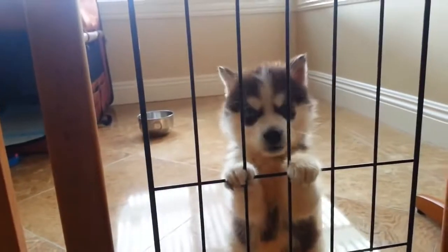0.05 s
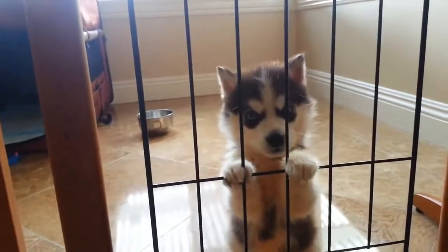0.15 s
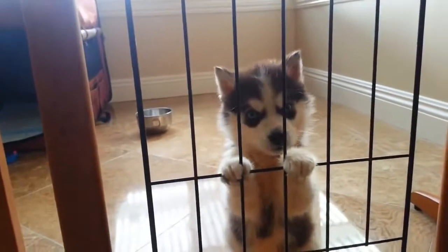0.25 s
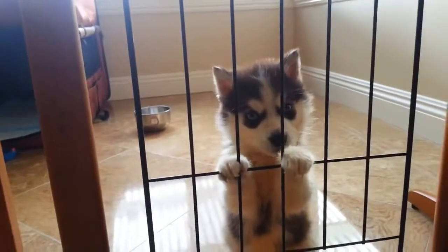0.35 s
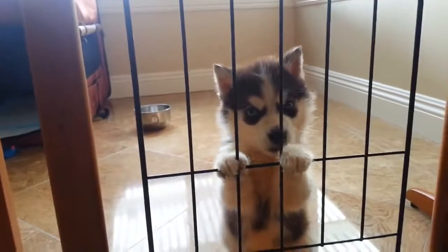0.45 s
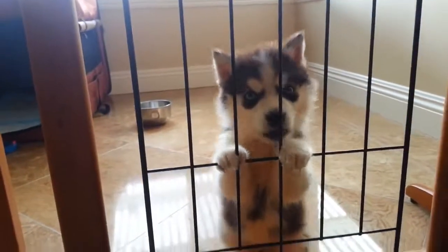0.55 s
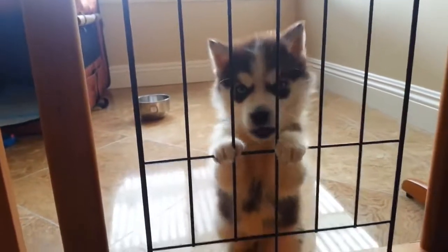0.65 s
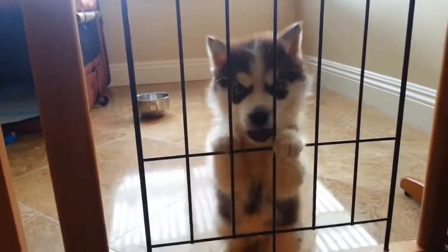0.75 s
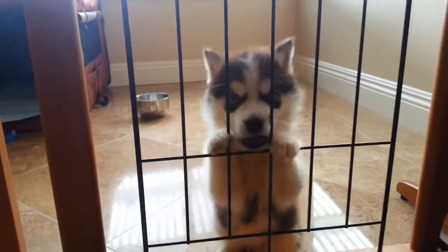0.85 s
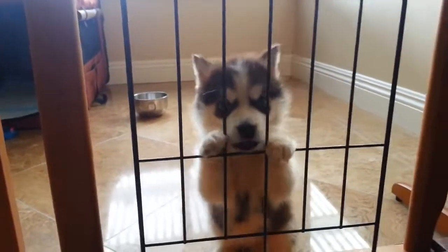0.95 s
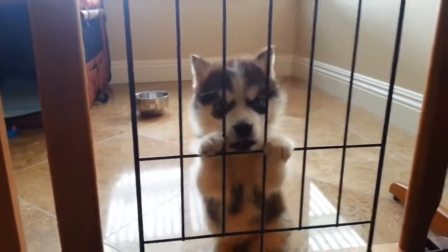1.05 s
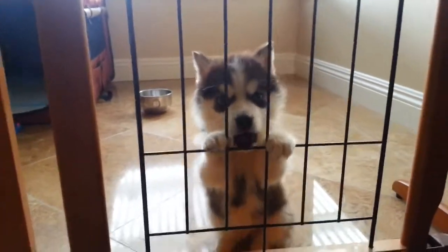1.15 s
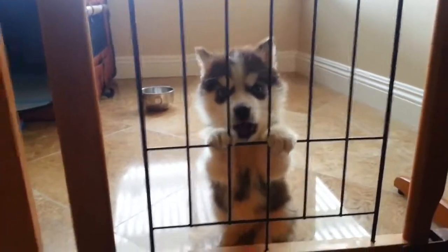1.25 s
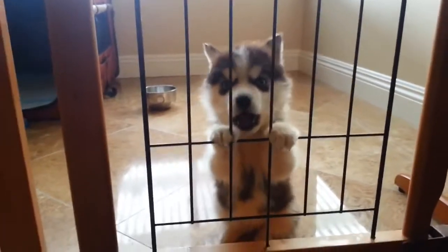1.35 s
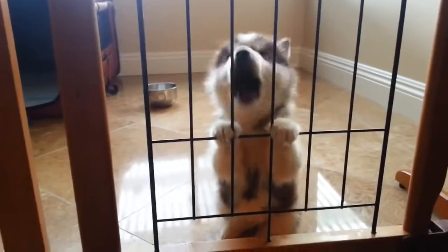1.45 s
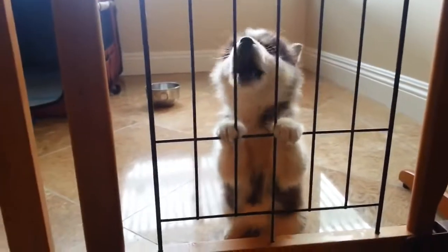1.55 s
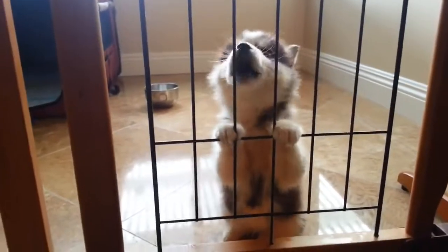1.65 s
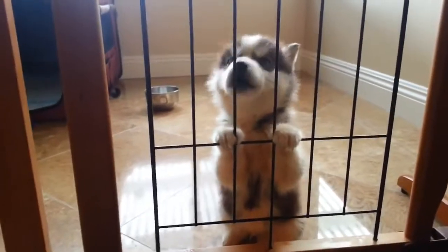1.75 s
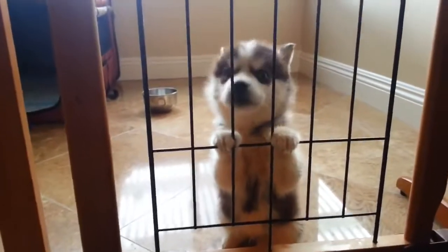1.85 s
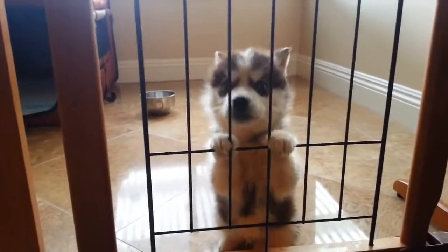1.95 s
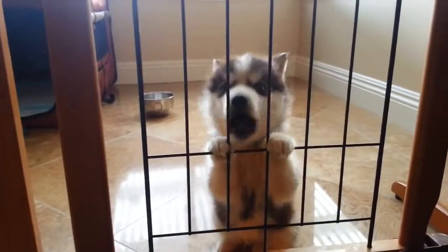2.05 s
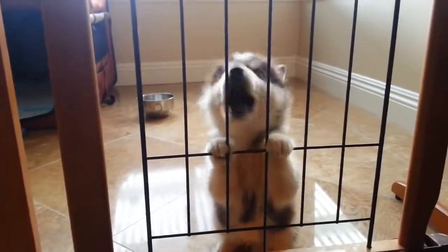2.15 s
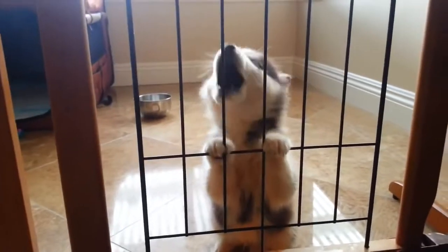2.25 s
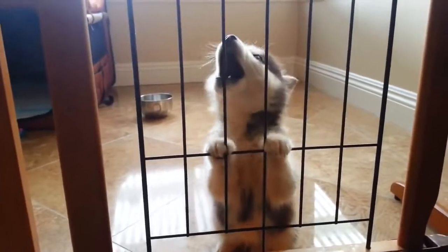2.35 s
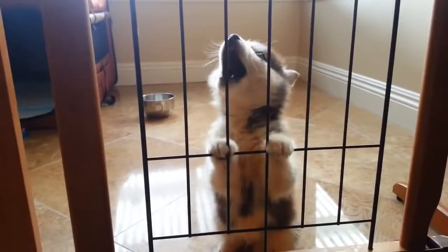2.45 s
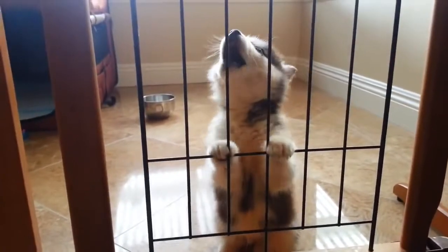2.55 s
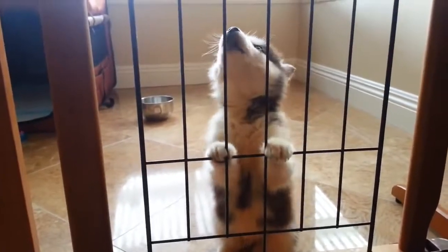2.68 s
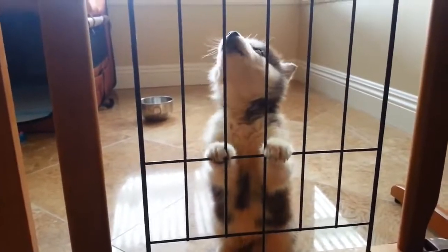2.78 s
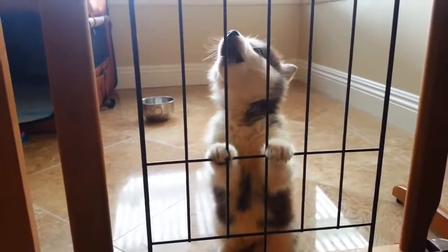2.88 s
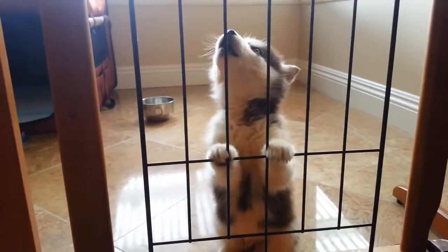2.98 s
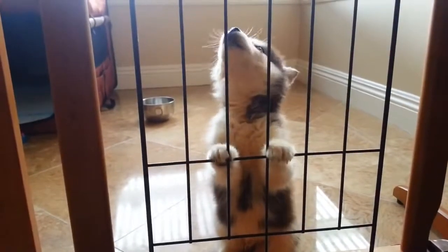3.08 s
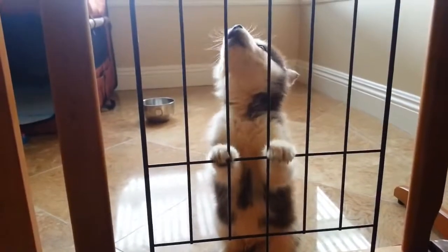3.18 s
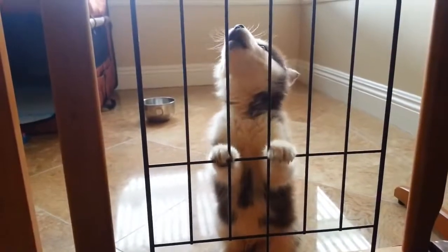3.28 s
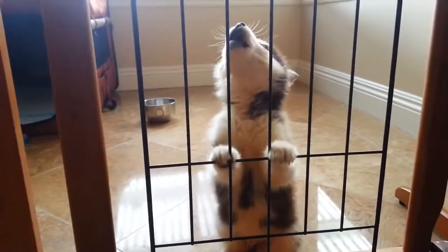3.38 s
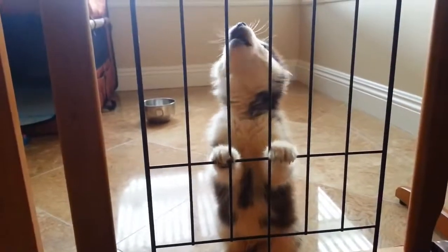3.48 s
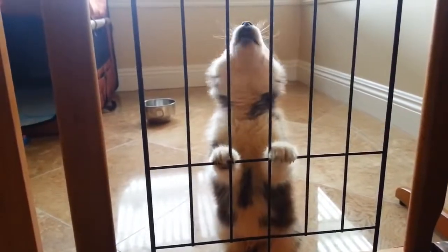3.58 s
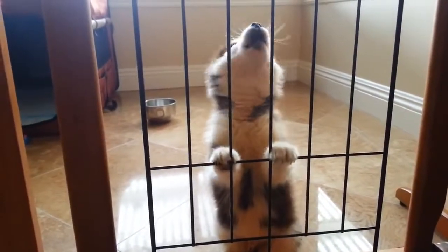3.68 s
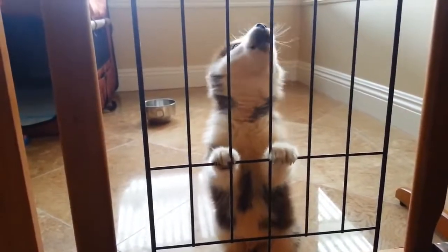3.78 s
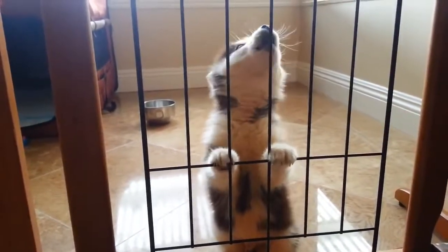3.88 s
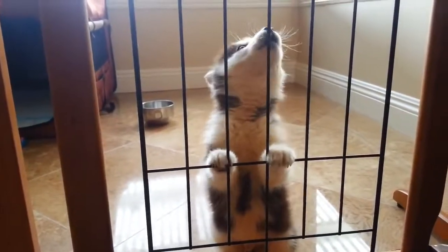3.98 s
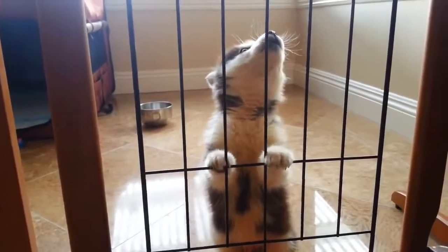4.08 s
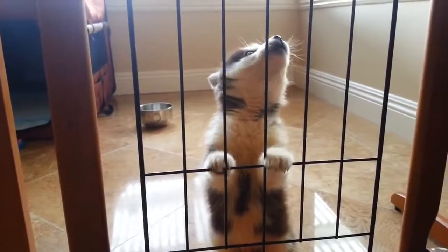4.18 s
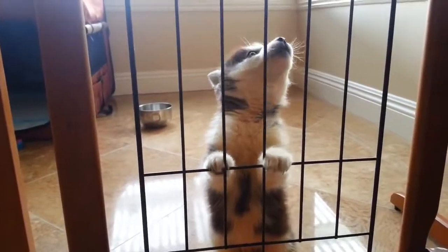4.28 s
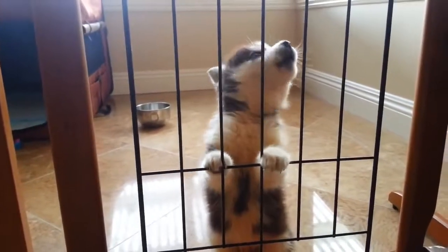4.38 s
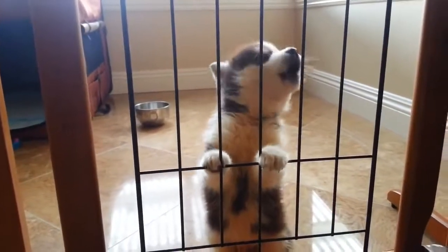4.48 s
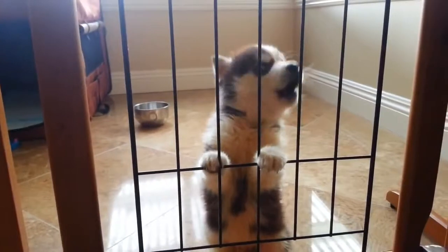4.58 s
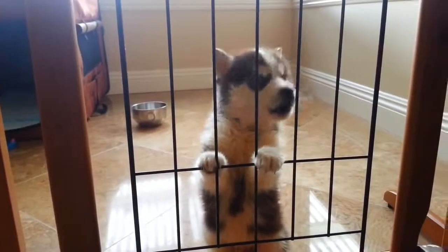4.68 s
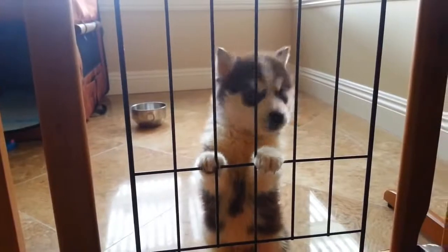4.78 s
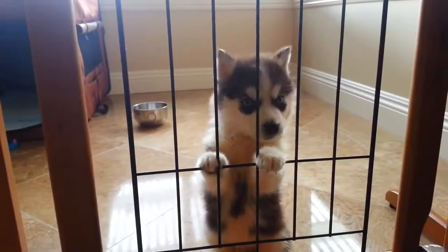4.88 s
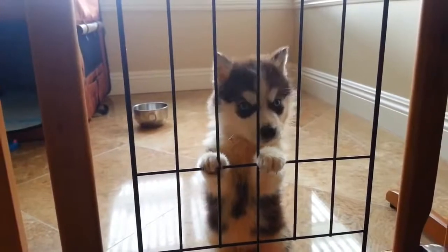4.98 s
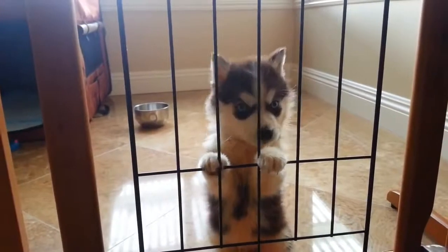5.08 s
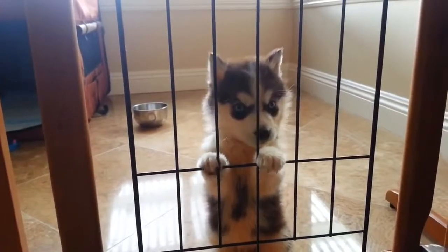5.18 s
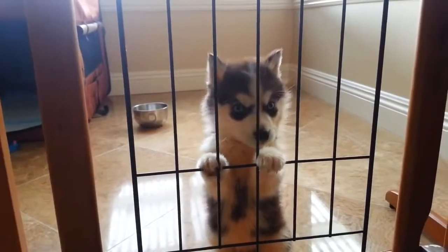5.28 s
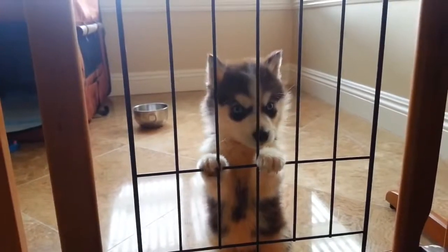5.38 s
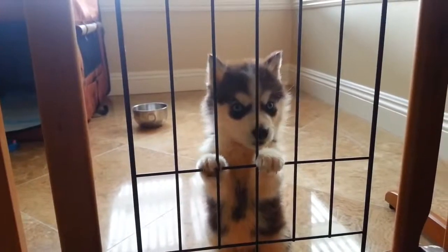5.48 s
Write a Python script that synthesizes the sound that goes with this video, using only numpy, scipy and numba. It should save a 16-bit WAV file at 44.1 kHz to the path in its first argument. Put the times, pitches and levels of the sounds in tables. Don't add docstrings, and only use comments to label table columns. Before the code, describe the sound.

Indoors in a hard tiled room, a fading puppy whine rings out and claws tick on pen wire. A faint sniff leads into a chirp and a warbling yowl, then separate swooping yelps that crack and fall. A short whimper and clipped gulp precede one long steady howl. It closes with a tiny breath, leaving very quiet room tone. A close phone microphone picks up bright echoes and low hum.

```python
import sys
import numpy as np
from scipy import signal
from scipy.fft import rfft, irfft
from scipy.io import wavfile
from scipy.ndimage import uniform_filter1d, minimum_filter1d
from numba import njit

SR = 44100
rng = np.random.default_rng(int(sys.argv[2]) if len(sys.argv) > 2 else 0)


def pcm_store(signal):
    levels = np.round(np.clip(np.atleast_2d(signal), -1, 1) * 32767)
    wavfile.write(sys.argv[1], SR, levels.astype(np.int16).T)


def field_ratio(decibels):
    return 10 ** (np.asarray(decibels, dtype=float) / 20)


N = 243873
TIME = np.arange(N) / SR
HZ = np.arange(N // 2 + 1) * SR / N


def on_log(table, hz):
    f, v = np.transpose(table)
    return np.interp(np.log(np.maximum(hz, 1)), np.log(f), v)


def unit(x):
    return x / np.sqrt(np.mean(x ** 2))


def band(x, hz, width_hz):
    return irfft(rfft(x) / (1 + ((HZ - hz) / width_hz) ** 2), N)


def walk(rate_hz):
    k = int(SR / rate_hz)
    steps = np.repeat(rng.standard_normal(N // k + 1), k)
    return unit(uniform_filter1d(uniform_filter1d(steps, k), k)[:N])


def loudness(x, seconds):
    keep = np.exp(-1 / (seconds * SR))
    return np.sqrt(signal.lfilter([1 - keep], [1, -keep], np.mean(x ** 2, axis=0), zi=[1e-3])[0])


# [f/Hz, level/dB]
YELP = [(820, -22), (1400, -14.5), (1900, -15), (2300, -20.5), (2870, -3), (3350, -18), (3880, -5),
        (4200, -12.5), (4450, -7.5), (5150, -17.5), (5700, -0.5), (6150, -12.5), (6650, -19.5),
        (7600, -15.5), (8950, -24.5), (13000, -49.5)]
YELP_UP = [(940, -27.5), (1600, -11.5), (2200, -23), (2600, -5), (3330, -20.5), (3900, -37), (4700, -28.5),
           (5400, -11), (6250, 2), (6900, -43), (9970, -48), (11200, -86), (22000, -120)]
YELP_RAISED = [(940, -18.5), (1600, -14.5), (2100, -8.5), (2600, -15), (3400, -6), (3900, -35.5),
               (4700, -26.5), (5300, -12.5), (6100, -20.5), (6700, -10), (7700, -16.5), (9970, -26.5),
               (11200, -90), (22000, -120)]
YELP_SHUT = [(820, -15.5), (1400, 6), (1820, -3), (2140, -37), (2560, -4.5), (3140, -41.5), (3800, -56),
             (5740, -18), (7520, -25.5), (9670, -45.5), (12000, -80.5), (15600, -114), (22000, -120)]
WHINE = [(1060, -28), (1850, 5), (2500, -27), (3500, -18), (5200, -9.5), (6500, -6), (7400, 1),
         (8500, -15.5), (11000, -45)]
YOWL = [(1180, -37), (2000, 12.5), (2620, -5.5), (3370, -5), (4400, 1.5), (5810, 3), (6570, 3.5),
        (9780, -15.5), (11800, -21.5), (14000, -65)]
YOWL_WIDE = [(1180, -25), (2000, -2), (2750, -14.5), (3300, -0.5), (3800, -2), (5300, -5), (6300, -15),
             (7600, -6.5), (8600, -21.5), (10200, -18), (11000, -44.5), (12500, -74)]
YOWL_FRONT = [(1180, -24.5), (2500, -47), (3150, -17.5), (4200, -9), (4980, 0.5), (5530, 4.5), (5950, -16),
              (7000, -3.5), (8200, -15.5), (9200, -23.5), (11100, -47), (12500, -71)]
YOWL_HARSH = [(1180, -28.5), (2100, 4.5), (2600, -16.5), (3100, 1.5), (3600, -4.5), (4300, -18.5),
              (5600, -3.5), (6400, -4), (7500, -12.5), (9780, -14), (12000, -52.5)]
YOWL_LOW = [(1180, -21), (2000, -2.5), (2620, 11), (3300, -4), (4000, -4), (4600, -6), (5250, 6),
            (5900, -5), (6500, 4), (7200, -3), (9780, -20), (11800, -40), (14000, -68.5)]
YOWL_PEAL = [(1180, -34), (2400, 3), (2980, -4), (3600, -15), (4600, -10.5), (5500, 2), (6500, -8),
             (7300, -8), (9920, -21), (11500, -72.5)]
HOWL = [(1060, -40.5), (1800, -7), (2600, -7.5), (2930, -25.5), (4270, -28), (5740, -5), (6100, -12.5),
        (7390, -16), (7990, -25.5), (9100, -17), (11500, -44.5), (14400, -26)]
HOWL_LEVEL = [(1060, -39), (1900, -10), (2400, -25), (2930, -21), (3400, -27), (4270, -23.5), (5300, -5),
              (5740, 0.5), (6300, -3), (7390, -16), (7990, -27.5), (9100, -45.5), (11500, -37.5),
              (14400, -32.5)]
HOWL_OPEN = [(1060, -29), (1900, -5), (2420, -3), (2930, -17), (4270, -22), (5740, 1), (6100, 6),
             (7390, -23), (7990, -34), (9100, -31), (11500, -34), (14400, -32)]
HOWL_CLOSING = [(1060, -26), (1800, -2), (2510, -52), (2930, -14), (3230, -13), (3430, -22), (4010, -28.5),
                (4860, -2), (5490, -16.5), (7070, 6), (8490, -25), (14400, -32)]
# [t/s, pitch f/Hz, level/dB, overtone number the throat rings on, bright edge level/dB]
FADING = [(0.0, 656, -20, 1.8, -29), (.024, 605.6, -36.5, 1.7, -33.5), (.078, 580, -41, 1.5, -44),
          (.1, 569.5, -33.5, 1.4, -48.5), (.15, 580, -35.5, 1.3, -55), (.2, 606, -45.5, 1.2, -60)]
CHIRP = [(.755, 1035, -38, 1.8, -52), (.769, 1043, -17, 3.8, -25), (.8, 1096, -28.5, 2, -40.5),
         (.822, 1142, -47.5, 1, -34)]
SLIDE = [(.875, 1017, -50, 2, -42), (.887, 1018, -18, 2.58, -25), (.9, 968, -25, 2.47, -24.5),
         (.906, 663.7, -24, 2.4, -18.5), (.92, 652.4, -23, 2.23, -15)]
ARCH = [(.94, 880, -20, 2.38, -23.5), (.955, 972, -26.5, 2.6, -14.5), (.993, 887, -20.5, 1.85, -26),
        (1.03, 792, -28.5, 1.58, -19.5), (1.045, 682, -22.5, 2.6, -27.5), (1.055, 632, -17.5, 2.2, -21.5)]
WARBLE = [(1.08, 779, -29, 2.64, -22.5), (1.095, 798, -27.5, 2.4, -18), (1.131, 755, -19, 2.9, -26),
          (1.155, 705.4, -27, 2.5, -24.5), (1.175, 730, -27.5, 2.8, -24), (1.207, 686, -15, 2.06, -18.5),
          (1.25, 675.7, -22.5, 2.67, -23), (1.283, 825, -19, 2.03, -25), (1.3, 1071, -34, 1.74, -54)]
FALL = [(1.573, 1079, -31.5, 1.39, -30.5), (1.585, 1066, -18.5, 1.67, -9.5), (1.6, 986, -20.5, 1.82, -19),
        (1.655, 836, -16, 2, -31), (1.7, 739, -17.5, 2.37, -23)]
HOOK = [(1.716, 665.6, -20.5, 2.52, -26), (1.745, 706.4, -18.5, 2.57, -26.5),
        (1.765, 810, -20.5, 1.83, -17), (1.787, 738, -15.5, 1.84, -26.5)]
DROOP = [(1.82, 798, -23, 1.7, -59.5), (1.84, 695, -26.5, 1.64, -33.5), (1.95, 544, -31.5, 1.53, -45),
         (2.06, 529, -57.5, 0.92, -73.5)]
SECOND_FALL = [(2.224, 1107, -36.5, 1.69, -17.5), (2.245, 989.3, -19.5, 1.74, -21.5),
               (2.271, 944, -16, 1.96, -23.5), (2.332, 781, -18, 2.18, -25)]
REBOUND = [(2.337, 653.3, -24.5, 2.49, -16.5), (2.37, 635.3, -21, 2.65, -16), (2.4, 714.4, -22, 2.48, -17),
           (2.412, 996, -16.5, 2.31, -23), (2.432, 1073, -26.5, 1.43, -31.5)]
CRACK = [(2.436, 535, -20, 3.5, -22.5), (2.444, 525, -15, 2.75, -23.5), (2.454, 513, -28, 3, -26),
         (2.464, 557, -28.5, 2.74, -16), (2.476, 518, -30, 2.65, -21), (2.498, 539.5, -35.5, 3.1, -32),
         (2.514, 530, -35.5, 1.91, -27.5), (2.524, 517, -32, 2, -16)]
PEAL = [(2.528, 787, -18.5, 2.26, -22), (2.572, 811, -14.5, 2.05, -24), (2.585, 913.6, -9, 2.35, -11.5),
        (2.623, 924.6, -16, 1.89, -40), (2.66, 879.6, -15.5, 1.785, -26.5), (2.676, 779, -26, 1.7, -31.5),
        (2.687, 680, -28, 1.59, -41), (2.697, 632, -32.5, 1.57, -40.5), (2.72, 570, -25.5, 1.65, -35)]
WHIMPER = [(3.0, 713.3, -13.5, 2.32, -30), (3.03, 575.3, -38.5, 1.5, -36.5), (3.08, 540.2, -46, 1.5, -45),
           (3.126, 493.3, -43.5, 1.58, -62.5), (3.176, 475.8, -36.5, 1.9, -50.5),
           (3.214, 373.6, -44, 2.3, -44.5), (3.244, 290.2, -36.5, 2.52, -51),
           (3.26, 273.1, -42.5, 2.25, -51)]
GULP = [(3.459, 595, -13.5, 2.5, -34), (3.48, 598.5, -30, 1.9, -47.5)]
HOWL_RISE = [(3.61, 496, -43, 1.37, -44.5), (3.621, 512, -39.5, 1.87, -50.5),
             (3.629, 519.8, -27, 2.38, -47), (3.76, 529.2, -23.5, 2.376, -42),
             (3.88, 518.2, -13.5, 2.235, -41), (3.955, 515, -13.5, 2.21, -45), (3.984, 510, -26, 2.45, -43),
             (4.067, 487.2, -19, 2.33, -49), (4.13, 478.8, -19.5, 2.365, -47)]
HOWL_HOLD = [(4.22, 479.5, -25.5, 2.55, -42), (4.35, 485.8, -27.5, 2.45, -41), (4.41, 479, -25, 2.78, -40)]
HOWL_FLARE = [(4.45, 485.2, -19, 2.38, -41), (4.48, 479.2, -19, 2.58, -38.5)]
HOWL_EBB = [(4.53, 482.2, -25.5, 2.9, -40), (4.59, 483.7, -24, 3.5, -41.5), (4.686, 494.3, -32, 3.8, -39),
            (4.8, 495.5, -32.5, 2.7, -36.5), (4.85, 511.4, -43.5, 2.15, -37.5),
            (4.882, 506.5, -30.5, 1.45, -47)]
HOWL_END = [(4.906, 548, -38.5, 1.8, -40), (4.936, 531.5, -33, 1.57, -48), (4.941, 534, -29, 1.22, -55),
            (4.945, 720, -52, 1.83, -50), (4.955, 716, -30, 0.96, -46), (4.975, 673, -54, 1.13, -44)]
THROAT_Q = [2, 0.86, 2.7, 14, 3.3, 9.4, 4.5, 16, 31, 12, 12, 36, 3.3, 5.2, 4.3, 1.8, 4.45, 1.85, 1.76]


def voicing():
    voiced = [
        (FADING, WHINE, WHINE, .06, .9),
        (CHIRP, YOWL_WIDE, YOWL_WIDE, .04, .08),
        (SLIDE, YOWL_WIDE, YOWL_WIDE, .05, .05),
        (ARCH, YOWL_WIDE, YOWL_WIDE, .015, .03),
        (WARBLE, YOWL_WIDE, YOWL_FRONT, .015, .02),
        (FALL, YELP, YOWL, .14, .05),
        (HOOK, YOWL_HARSH, YOWL_HARSH, .04, .2),
        (DROOP, YOWL, YOWL, .5, .75),
        (SECOND_FALL, YOWL, YOWL, .07, .03),
        (REBOUND, YOWL_LOW, YOWL_LOW, .015, .05),
        (CRACK, YOWL, YOWL, .4, .55),
        (PEAL, YOWL_PEAL, YOWL_PEAL, .015, .12),
        (WHIMPER, YELP_RAISED, YELP_RAISED, .7, .8),
        (GULP, YELP_SHUT, YELP_SHUT, .5, .6),
        (HOWL_RISE, HOWL, HOWL, .03, .01),
        (HOWL_HOLD, HOWL_LEVEL, HOWL_LEVEL, .008, .008),
        (HOWL_FLARE, HOWL_OPEN, HOWL_OPEN, .008, .008),
        (HOWL_EBB, HOWL_LEVEL, HOWL_CLOSING, .008, .02),
        (HOWL_END, HOWL_CLOSING, HOWL_CLOSING, .25, .8),
    ]
    return [(*v, q) for v, q in zip(voiced, THROAT_Q)]


# [share of length 0-1, level/dB, edge level/dB]
SCOOP_SWELL = [(0, -21, -13), (.15, -5.5, -7), (.6, -1.5, -3), (1, -8, -3.5)]


def scoop(start_s, length_s, from_hz, to_hz, db, throat_hz, edge_db, swell_db):
    bend, catch_overtone = 2.1, 1.7
    u = np.linspace(0, 1, 12)
    hz = from_hz * (to_hz / from_hz) ** u ** bend
    share, level_db, edge_level_db = np.transpose(SCOOP_SWELL)
    tilt_db = swell_db * (u - .5)
    level = db + tilt_db + np.interp(u, share, level_db)
    edge = edge_db + tilt_db + np.interp(u, share, edge_level_db)
    return np.transpose([start_s + length_s * u, hz, level, np.maximum(throat_hz / hz, catch_overtone), edge])


# [t/s, length/s, from f/Hz, to f/Hz, level/dB]
SCOOPS = [(1.485, 0.083, 375, 941.7, -19), (2.134, 0.078, 345, 864.7, -16.5),
          (2.885, .093, 405, 888, -16.5), (3.385, 0.064, 350, 576, -20)]
# [resonance f/Hz, bright edge level/dB, Q, extra swell/dB]
SCOOP_THROAT = [(1359, -15.5, 4.3, 1), (1250, -13, 5, 0.7), (1022, -16.5, 9.1, 3), (1274, -35, 3.18, 17.5)]


def syllables():
    air = .045
    mouths = [(YELP, YELP), (YELP, YELP), (YELP_UP, YELP_RAISED), (YELP_SHUT, YELP_SHUT)]
    said = voicing()
    for row, (hz, edge_db, q, swell_db), mouth in zip(SCOOPS, SCOOP_THROAT, mouths):
        said.append((scoop(*row, hz, edge_db, swell_db), *mouth, air, air, q))
    return sorted(said, key=lambda v: v[0][0][0])


def throat(db, overtone, q):
    r = np.arange(1, 4)[:, None] / overtone
    power = 1 / ((1 - r ** 2) ** 2 + (r / q) ** 2) ** 2
    return db + 10 * np.log10(power / power.sum(axis=0))


# [start t/s, end t/s, depth 0-1]
FOLDS = [(0.902, 0.93, 0), (1.058, 1.078, 0.58), (1.581, 1.601, 0.3), (2.21, 2.24, 0.15)]


def voice(hz, low_db, top_db, air_at, mouth_at):
    spans = [(depth, 1. * (TIME > a) * (TIME < b)) for a, b, depth in FOLDS]
    broken = uniform_filter1d(sum(on for _, on in spans), size=600)
    doubling = uniform_filter1d(sum(depth * on for depth, on in spans), size=300)
    air = np.minimum(np.interp(TIME, *np.transpose(air_at)) + .25 * broken, .95)
    rasp = .006 + .25 * air ** 2
    phase = 2 * np.pi * np.cumsum(hz * (1 + 0.002 * walk(40))) / SR
    phase = phase + rasp * 0.11 * walk(450)
    low = sum(field_ratio(db) * np.sqrt(2) * np.cos((k + 1) * phase + k) for k, db in enumerate(low_db))

    shapes = [YOWL, YOWL_WIDE, YOWL_FRONT, YOWL_PEAL, YOWL_HARSH, YOWL_LOW, HOWL_OPEN, HOWL_LEVEL,
              WHINE, YELP, YELP_UP, YELP_RAISED, YELP_SHUT, HOWL, HOWL_CLOSING]
    mouth_s = [s for s, _ in mouth_at]
    held = [np.interp(TIME, mouth_s, [m is shape for _, m in mouth_at]) for shape in shapes]
    tones, power = 0, 1e-12
    for k in range(4, 30):
        f = k * hz[::8]
        shape_db = sum(w[::8] * on_log(shape, f) for w, shape in zip(held, shapes))
        gain = field_ratio(shape_db) * (f < SR / 3) / (1 + (f / 11000) ** 6)
        power = power + gain ** 2 / 2 * (f > 3000) * (f < 10000)
        clear = (1 - air) ** ((k * hz / 3500) ** 2) * field_ratio(2.8 * walk(30))
        tones = tones - np.repeat(gain, 8)[:N] * clear * np.cos(k * phase + rng.uniform(0, 2.2))
    tones = tones / np.sqrt(np.repeat(uniform_filter1d(power, size=100), 8)[:N])

    white = rfft(rng.standard_normal(N))
    hiss = sum(w * unit(irfft(white * field_ratio(on_log(shape, HZ)) * HZ ** .1, N))
               for w, shape in zip(held, shapes))
    hiss = hiss * (1 + 1.22 * np.cos(phase))
    top = field_ratio(top_db) * (tones + np.sqrt(.55 * air) * hiss)
    shimmer = 1 + rasp * 0.81 * walk(600) + doubling * 1.2 * np.cos(phase / 2)
    cry = (low + top) * shimmer / np.sqrt(1 + rasp ** 2 + doubling ** 2)
    return signal.sosfilt(signal.butter(6, 480, "high", fs=SR, output="sos"), cry)


# [start t/s, end t/s, attack/s, release/s]
CALLS_AT = [(-.1, 0.174, .01, 0.021), (0.744, 0.822, 0.057, 0.0093), (0.862, 1.295, 0.0082, 0.028),
            (1.487, 2.073, 0.004, 0.03), (2.133, 2.716, 0.015, 0.017), (2.883, 3.263, 0.006, .02),
            (3.38, 3.467, 0.0076, 0.027), (3.601, 4.967, 0.018, 0.019)]


def breath():
    return sum(np.clip((TIME - a) / up, 0, 1) * np.clip((b - TIME) / down + .5, 0, 1)
               for a, b, up, down in CALLS_AT)


def cry():
    said = syllables()
    s, *columns = np.transpose(np.concatenate([v[0] for v in said]))
    air_at, mouth_at, q_at = [], [], []
    for rows, mouth_start, mouth_end, air_start, air_end, q in said:
        start_s, end_s = rows[0][0], rows[-1][0]
        air_at += [(start_s, air_start), (end_s, air_end)]
        mouth_at += [(start_s, mouth_start), (end_s, mouth_end)]
        q_at += [(start_s, q), (end_s, q)]
    throat_q = np.interp(TIME, *np.transpose(q_at))
    lag_samples = (60, 250, 250, 250)
    hz, db, overtone, top_db = (uniform_filter1d(np.interp(TIME, s, c), size=n)
                                for c, n in zip(columns, lag_samples))
    return voice(hz, throat(db, overtone, throat_q), top_db, air_at, mouth_at) * breath()


# [t/s, level/dB]
SNIFF = [
    [(0.6, -58), (0.736, -57.5), (0.76, -42.5)],
    [(4.93, -53.5), (4.978, -47.5), (5.1, -81.5)],
]


def sniff():
    first, last = SNIFF
    gap = [(first[-1][0] + 0.052, -120), (last[0][0] - .05, -120)]
    s, db = np.concatenate([first, gap, last]).T
    hiss = unit(band(band(rng.standard_normal(N), 7000, 1400), 7300, 2500))
    return hiss * field_ratio(np.interp(TIME, s, db, -120, -120) + 5.5)


# [t/s, peak level/dB, brightness f/Hz, ring/s]
CLAWS = [(0.2296, -20.5, 3960, 0.11), (0.231, -27.5, 1500, 0.17), (0.231, -26, 5500, .06),
         (0.469, -38.5, 1480, 0.043), (0.53, -39.5, 1500, 0.037), (0.6302, -12.5, 4000, 0.03),
         (5.377, -67, 2150, 0.03)]
# [t/s, peak level/dB, brightness f/Hz, ring/s]
TONGUE = [(4.715, -21, 7900, 0.038), (4.665, -34, 7200, .05), (2.139, -24, 12500, .14),
          (1.49, -29, 12500, .09)]


def claws():
    out = np.zeros(N)
    for s, db, hz, ring_s in [*CLAWS, *TONGUE]:
        age = np.maximum(TIME - s, 0)
        burst = unit(band(band(rng.standard_normal(N), hz, .6 * hz), hz, .7 * hz))
        decay = np.minimum(age / .005, 1) * 1000. ** (-age / ring_s)
        out += field_ratio(db - 13.5) * burst * (TIME > s) * decay
    return out


# [left delay/s, right delay/s, level/dB]
ECHOES = [(.0021, 0.0034, -9), (.0047, 0.0037, -12.5), (.0083, 0.012, -13.5)]


def echoes(x):
    x = signal.sosfilt(signal.butter(2, 1200, "high", fs=SR, output="sos"), x)

    def late(s):
        return np.interp(TIME - s, TIME, x, 0, 0)

    return sum(field_ratio(db) * np.array([late(left), late(right)]) for left, right, db in ECHOES)


# [f/Hz, level/dB, t60/s]
STANDING = [(1050, -8, 0.17), (1331, 3, 1), (1860, -0.5, 0.47), (5230, -6, 0.32)]


def standing(x):
    out = 0
    for hz, db, t60_s in STANDING:
        r = 1000. ** (-1 / (t60_s * SR))
        poles = [1, -2 * r * np.cos(2 * np.pi * hz / SR), r * r]
        out = out + field_ratio(db + 4.0) * signal.lfilter([1 - r, 0, r - 1], poles, x)
    return out


@njit
def walls(x, lags, gain, damp):
    line, soft, out = np.zeros((8, 4096)), np.zeros(8), np.zeros((2, len(x)))
    for i in range(len(x)):
        total = 0.
        for k in range(8):
            soft[k] += (1 - damp) * (gain[k] * line[k, (i - lags[k]) & 4095] - soft[k])
            total += soft[k]
            out[k % 2, i] += soft[k]
        for k in range(8):
            line[k, i & 4095] = x[i] * (1 - 2 * (k // 2 % 2)) + soft[k] - total / 4
    return out


def tiled_room(x):
    t60_s, damp, level_db = 0.59, 0.29, -11.5
    lags = rng.integers(350, 2400, 8)
    return field_ratio(level_db) * walls(x + 1e-18, lags, field_ratio(-60 * lags / SR / t60_s), damp)


def earlier_call():
    ring = unit(band(band(rng.standard_normal(N), 1365, 130), 1400, 170))
    return ring * field_ratio(-23 - 123 * TIME)


# [f/Hz, level/dB per Hz]
TONE = [(15, -73), (25, -35.5), (85, -13.5), (127, 2), (274, -10.5), (322, -10), (377, -13.5), (467, -12.5),
        (957, -23), (8720, -33.5), (11700, -37.5), (14400, -39.5)]
# [f/Hz, share 0-1]
TONE_ALIKE = [(25, .7), (60, .9), (130, 0.92), (280, 0.95), (620, .9), (1350, .3), (2950, 0.05), (14000, 0)]
# [f/Hz, level/dB]
MOTOR = [(121, -59.5), (145, -67)]


def room_tone():
    alike = np.clip(on_log(TONE_ALIKE, HZ), 0, 1)
    mid, side = (rfft(rng.standard_normal(N)) * field_ratio(on_log(TONE, HZ)) for _ in range(2))
    pair = irfft(mid * np.sqrt(1 + alike) + side * np.sqrt(1 - alike) * np.array([[1], [-1]]), N)
    hum = sum(field_ratio(db + walk(10.0)) * np.sin(2 * np.pi * hz * TIME) for hz, db in MOTOR)
    return unit(pair) * field_ratio(-47.5 + 1.5 * walk(3)) + hum


# [t/s, left minus right level/dB]
SWING = [(0.0, -6), (3.2, -3), (3.85, -2.5), (4.68, -6), (5.0, -6)]


def scene():
    pup = cry() + sniff() + claws()
    turn = field_ratio((np.interp(TIME, *np.transpose(SWING)) + 2.5) * 0.65)
    near = field_ratio(2.0) * pup * np.array([turn, 1 / turn])
    near = near + echoes(pup) + standing(pup) + tiled_room(pup) + earlier_call()
    duck = 1 + loudness(np.diff(near, prepend=0) * 3, 0.025) / field_ratio(-18.5)
    tone = room_tone()
    deep = signal.sosfilt(signal.butter(2, 170, fs=SR, output="sos"), tone)
    return near + deep / duck ** 0.16 + (tone - deep) / duck ** 0.6


# [f/Hz, left minus right level/dB]
PORT_DB = [(60, -6), (110, -3.5), (200, -0.5), (370, 1.5), (680, -0.5), (1240, -6.5), (2270, -8), (4170, 9),
           (7640, -11), (9500, -12.5), (11500, -12.5), (14000, 5)]


def two_ports(dry):
    lead_s = 6e-5
    hz = np.arange(N + 1) * SR / (2 * N)
    half = field_ratio(on_log(PORT_DB, hz) / 2) * np.exp(1j * np.pi * hz * lead_s)
    return irfft(rfft(dry, 2 * N) * np.array([half, 1 / half]), 2 * N)[:, :N]


def gate(x):
    threshold_db, depth_db, hush_s, hush_db = -28, 11, 5.07, -7
    shut = 1 / (1 + (loudness(np.diff(x, prepend=0) * 8, 0.054) / field_ratio(threshold_db)) ** 4)
    hush = np.clip((TIME - hush_s) / 0.061 + .5, 0, 1)
    return x * field_ratio(-depth_db * shut + hush_db * hush)


def limiter(x):
    ceiling = .92
    room = np.minimum(1, ceiling / np.maximum(np.abs(x).max(axis=0), 1e-9))
    return x * uniform_filter1d(minimum_filter1d(room, size=300), size=300)


# [f/Hz, level/dB]
STARVE = [(100, -15), (250, -21), (500, -19.5), (700, -24), (3000, -26), (7900, -20), (9000, -17.5),
          (11000, -27), (14000, -20)]
# [f/Hz, level/dB]
DEAD_ZONE = [(500, -30), (2000, -20), (7500, -17), (9000, -9), (14000, -6)]


def starve(x):
    scatter_db, lead = 3, 600
    how = dict(fs=SR, window="cosine", nperseg=2048, noverlap=1024)
    f, _, z = signal.stft(np.pad(x, ((0, 0), (lead, 0))), **how)
    power = np.mean(np.abs(z) ** 2, axis=0) + 1e-20
    busy = np.exp(np.log(power[(f > 1000) & (f < 8000)]).mean(axis=0))
    edges = np.r_[0:40:4, 40:120:8, 120:1025:16]
    width = np.diff(np.r_[edges, len(f)])
    bands = np.add.reduceat(power, edges) / width[:, None]
    floor_db = on_log(STARVE, f[edges] + f[width] / 2)[:, None]
    floor_db = floor_db + scatter_db * rng.standard_normal(bands.shape)
    keep = np.repeat(bands > busy * field_ratio(2 * floor_db), width, axis=0)
    alive = power > np.repeat(bands, width, axis=0) * field_ratio(2 * on_log(DEAD_ZONE, f))[:, None]
    return signal.istft(z * alive * keep, **how)[1][:, lead:lead + N]


def roll_off(x):
    return signal.sosfilt(signal.butter(12, 14600, fs=SR, output="sos"), x)


def record(dry):
    mix = starve(limiter(gate(two_ports(dry))))
    return roll_off(mix)


dry = scene()
out = record(dry)
pcm_store(out)
```